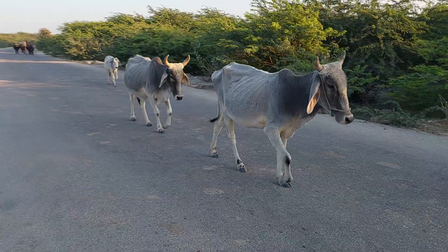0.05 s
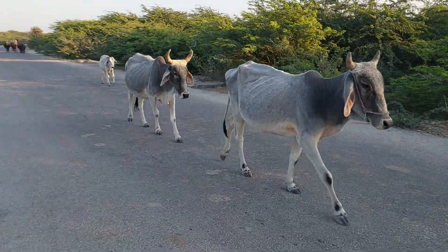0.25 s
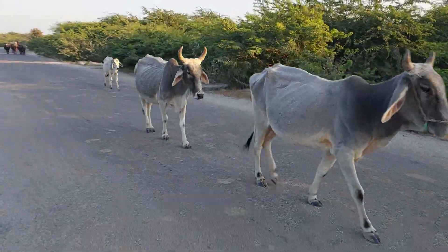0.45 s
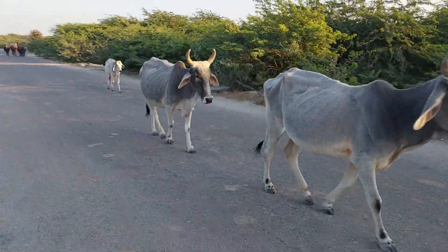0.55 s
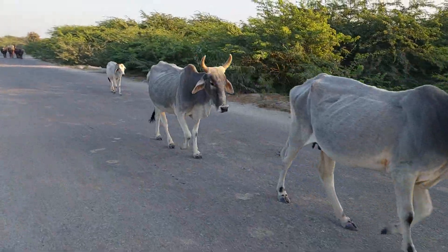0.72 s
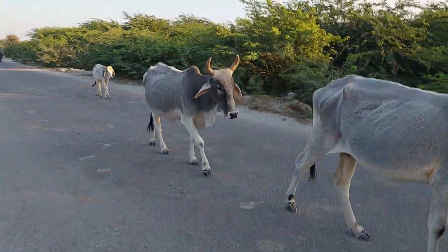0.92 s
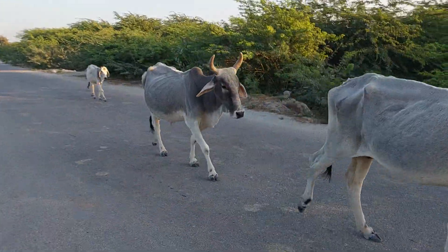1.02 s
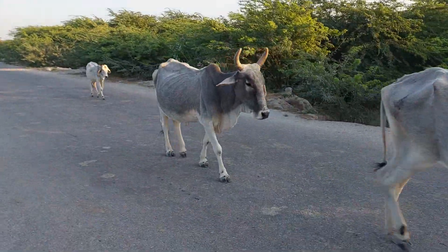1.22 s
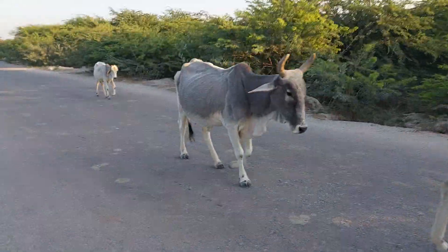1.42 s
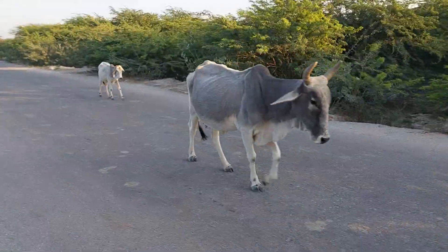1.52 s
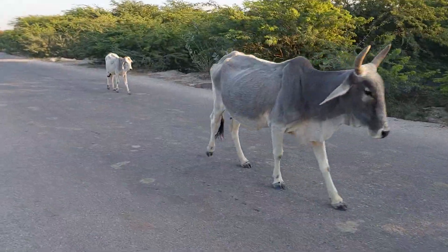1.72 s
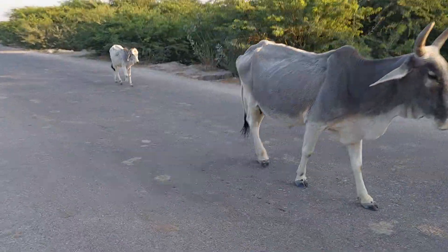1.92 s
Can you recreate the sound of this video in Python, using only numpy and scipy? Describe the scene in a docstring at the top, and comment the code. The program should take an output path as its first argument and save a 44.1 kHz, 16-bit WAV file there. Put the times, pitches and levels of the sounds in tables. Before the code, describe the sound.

Hoof scuffs and clicks of walking cattle on asphalt, with one-sided handling noise and faint bird notes

```python
"""Cattle scuff along a paved road past a hand-held phone: gritty noise drags, stone rings and hoof clicks.
A finger half covers the right microphone port: noise slides rub on it, short bursts tick,
pressure pulses pop and damped oscillations thump. The left port is open.
A far bird pipes one note as a level-shaped sine, over low rumble and hiss made of filtered noise."""
import sys
import numpy as np
from scipy import signal
from scipy.fft import rfft, irfft, next_fast_len
from scipy.io import wavfile
from scipy.ndimage import uniform_filter1d

SR = 44100
rng = np.random.default_rng(int(sys.argv[2]) if len(sys.argv) > 2 else 0)


def output_pcm(signal):
    """Save a mono or channel-first signal as 16-bit PCM at the path in sys.argv[1].

    Samples are clipped to [-1, 1] before scaling.
    """
    pcm = np.clip(np.atleast_2d(signal).T, -1, 1) * 32767
    wavfile.write(sys.argv[1], SR, np.round(pcm).astype(np.int16))


def invert_db(x):
    """Field ratio 10**(x/20) for x, a level in decibels (scalar or array-like)."""
    u = np.asarray(x, float) / 20
    return 10 ** u


N = 85995


def evened(x):
    """Power normalisation: scales to rms 1."""
    return x / np.sqrt(np.mean(x ** 2) + 1e-20)


def read(points, hz):
    """Logarithmic frequency scale: interpolates a spectrum table along it."""
    f, value = np.transpose(points)
    return np.interp(np.log(hz + 1), np.log(f + 1), value)


def add(mix, start_s, sound):
    """Linear superposition: adds a sound to the mix from start_s."""
    part = mix[round(start_s * SR):][:len(sound)]
    part += sound[:len(part)]


def colour(x, curve_db):
    """Linear filtering: multiplies the spectrum by a function from Hz to dB."""
    size = next_fast_len(len(x) + 4096)
    gain = invert_db(curve_db(np.fft.rfftfreq(size, 1 / SR)))
    return irfft(rfft(x, size) * gain, size)[:len(x)]


def gritty(n, per_s, spread_db):
    """Stick-slip friction: noise whose loudness jumps at random in sub-millisecond grains."""
    draw = rng.random((n, 2))
    size = invert_db(spread_db * np.minimum(-np.log(draw[:, 0] + 1e-9), 2.6))
    jumps = size * (draw[:, 1] < per_s / SR)
    loudness = 1.55 + signal.lfilter([1], [1, -.93], jumps)
    return evened(rng.standard_normal(n) * loudness)


def clicks(rows, decay_s, octaves, body):
    """Impulsive excitation: tiny decaying noise bursts in a band around their pitch."""
    out, t = np.zeros(N), np.arange(-256, 768) / SR
    for start_s, level_db, pitch_hz in rows:
        impulse = -2. * (abs(t) < 1e-6)
        burst = impulse + .5 * rng.standard_normal(len(t))
        burst = burst * np.exp(-abs(t) / decay_s) * (t >= 0)
        burst = colour(burst, lambda f: read(body, f) - 6 * (np.log2((f + 30) / pitch_hz) / octaves) ** 2)
        add(out, start_s + t[0], invert_db(level_db) * burst * 4 / np.linalg.norm(burst))
    return out


# resonances of crushed grit: pitch_hz
STONES_HZ = [2946, 4050, 5800]
STONE_RING_S, STONE_DB = 0.0003, -1.5  # decay time; level against the grit noise
SCUFF_GRITS_PER_S, SCUFF_GRIT_DB = 1200, 6.5  # grain rate and spread of grain levels


def crunch(n):
    """Impulse response of small resonators: grit noise plus sparse grains, each ringing one stone pitch."""
    grit, t = gritty(n, SCUFF_GRITS_PER_S, SCUFF_GRIT_DB), np.arange(300) / SR
    rings = np.zeros(n)
    for pitch_hz in STONES_HZ:
        draw = rng.random((n, 2))
        size = invert_db(-SCUFF_GRIT_DB * np.log(draw[:, 0] + 0.11))
        hits = size * (draw[:, 1] < SCUFF_GRITS_PER_S / SR / len(STONES_HZ))
        ring = t * np.exp(-t / STONE_RING_S) * np.sin(2 * np.pi * pitch_hz * t)
        rings = rings + np.convolve(hits, ring)[:n]
    return grit + invert_db(STONE_DB) * evened(rings)


# hooves dragging on grit, cut off at nine tenths of the length: start_s, length_s, level_db
SCUFFS = [(0.267, 0.036, -59.5), (0.372, 0.12, -57.5), (0.48, 0.14, -52.5), (0.792, 0.036, -53),
          (1.168, .025, -57.5), (1.3616, 0.034, -42), (1.389, 0.04, -50), (1.536, 0.016, -52.5),
          (1.666, 0.022, -59.5), (1.813, 0.019, -54.5), (1.838, 0.03, -55), (1.945, 0.025, -47)]
# spectrum of hoof on road, also read by the clicks: frequency_hz, level_db
SCUFF = [(100, 15), (700, 3), (3500, -2.5), (7500, -6), (15000, -16.5)]
SCUFF_RISE_S, SCUFF_FADE_DB = 0.0023, -13  # the fade would be complete at the full length


def hoof_scuffs():
    """Sliding friction: drags of crunching grit that rise fast and fade late."""
    out = np.zeros(N)
    for start_s, length_s, level_db in SCUFFS:
        t = np.arange(0, length_s * 0.9, 1 / SR)
        drag = evened(colour(crunch(len(t)), lambda f: read(SCUFF, f)))
        fade = invert_db(level_db + SCUFF_FADE_DB * (t / length_s) ** 4)
        add(out, start_s, np.minimum(t / SCUFF_RISE_S, 1) * fade * drag)
    return out


# hoof edges clicking on stones: start_s, level_db, pitch_hz
GRIT = [(.3967, -38, 2130), (.4955, -35.5, 1360), (.5706, -63, 3400), (1.03, -38, 1040),
        (1.1691, -36.5, 2150), (1.35, -36, 1400), (1.3655, -35, 3100), (1.3735, -42, 3080),
        (1.378, -40, 4500), (1.3957, -26.5, 5600), (1.4132, -32, 4860), (1.5432, -39, 1950),
        (1.6769, -36, 460), (1.7675, -52, 4400), (1.8156, -39, 1450), (1.842, -38, 5800),
        (1.8591, -41.5, 2940), (1.928, -47.5, 1960)]
GRIT_S, GRIT_OCTAVES = .0007, .5  # decay time; distance from the pitch to the -6 dB point


def hoof_clicks():
    """Impact excitation: hoof edges strike stones in short band-limited bursts."""
    return clicks(GRIT, GRIT_S, GRIT_OCTAVES, SCUFF)


ECHO_DB, ECHO_T60 = -9, .05  # level; seconds to decay by 60 dB


def hooves():
    """Diffuse scattering: drags and clicks gain a short noise tail off the road, different at each port."""
    direct = hoof_scuffs() + hoof_clicks()
    t = np.arange(3000) / SR
    tails = rng.standard_normal((2, 3000)) * invert_db(-60 * t / ECHO_T60) * np.minimum(t / 0.0048, 1)
    tails = tails / np.linalg.norm(tails[0])
    return direct + invert_db(ECHO_DB) * signal.fftconvolve(direct[None], tails, axes=1)[:, :N]


# the finger sliding over the right port: start_s, length_s, level_db (before a common lift), rise_s
RUBS = [(0.062, 0.049, -41, 0.013), (0.144, 0.11, -40, 0.056), (0.338, 0.075, -43.5, 0.0027),
        (0.396, 0.041, -34.5, 0.013), (0.435, 0.043, -36.5, 0.0042), (0.484, 0.019, -43, 0.024),
        (0.513, 0.025, -36.5, 0.0027), (0.58, 0.033, -36, 0.015), (0.612, 0.042, -32, 0.005),
        (0.675, 0.21, -49, 0.011), (0.7434, 0.022, -35, 0.0025), (0.7741, 0.02, -24.5, 0.0034),
        (0.789, 0.021, -34, 0.012), (0.851, 0.037, -34.5, 0.0032), (0.9328, 0.018, -37, 0.00067),
        (0.971, 0.029, -35.5, 0.005), (1.018, 0.022, -38, 0.0077), (1.135, 0.02, -34.5, 0.0041),
        (1.245, 0.024, -43, 0.0064), (1.3027, 0.035, -29, 0.0036), (1.7, 0.031, -37.5, 0.0015),
        (1.766, 0.018, -36, 0.0019)]
# spectrum of skin on the port, also read by the ticks: frequency_hz, level_db
RUB = [(40, 15), (250, 9), (800, 2.5), (2500, -3.5), (4500, -6.5), (6000, -16.5), (7600, -26.5),
       (11000, -12.5), (15500, -20.5)]
RUB_LIFT_DB, RUB_FADE_DB = 11.5, -12  # common lift; fade from the end of the rise to the length
RUB_OVERRUN_S = 0.0028  # time past the length; the closing ramp takes twice this
RUB_SLIPS_PER_S, RUB_SLIP_DB = 1000, 5  # slip rate and spread of slip levels
SLOW_S, SLOW_DULL_DB = 0.05, -7  # slow-rising slides are duller
CAVITY_HZ, CASE_HZ, CAVITY_DB = 2200, 274, 12.5  # they also ring the port cavity and the case
PRESS_BASS = 0.75  # dB of slide bass per dB of grip: a firmer grip gives more


def finger_rubs():
    """Stick-slip friction: skin slides shake the port cavity and case the more slowly they rise."""
    out = np.zeros(N)
    for start_s, length_s, level_db, rise_s in RUBS:
        t = np.arange(0, length_s + RUB_OVERRUN_S, 1 / SR)
        ramps = np.clip(np.minimum(t / rise_s, (t[-1] - t) / RUB_OVERRUN_S / 2), 0, 1)
        shape = ramps * invert_db(RUB_FADE_DB * np.maximum(t - rise_s, 0) / (length_s - rise_s))
        slow = np.tanh(rise_s / SLOW_S)
        bass_db = PRESS_BASS * (np.interp(start_s, *np.transpose(GRIP)) + 38)

        def slide_db(f):
            """Resonance: peaks at cavity and case on the skin spectrum."""
            peaks = sum(np.exp(-(4 * np.log(f / hz + 1e-9)) ** 2) for hz in (CAVITY_HZ, CASE_HZ))
            slow_db = SLOW_DULL_DB * (f > 2 * CAVITY_HZ) + CAVITY_DB * peaks
            return read(RUB, f) + bass_db / (1 + (f / 500) ** 2) + slow * slow_db

        slide = np.pad(shape * gritty(len(t), RUB_SLIPS_PER_S, RUB_SLIP_DB), 800)
        add(out, start_s - 800 / SR, invert_db(level_db + RUB_LIFT_DB) * colour(slide, slide_db))
    return out


# skin letting go of the case: start_s, level_db
TICKS = [(0.339, -33.5), (0.5108, -21), (.737, -26), (0.7447, -23), (0.7833, -18.5), (0.799, -19.5),
         (0.932, -24.5), (0.935, -15), (0.9385, -30), (0.956, -14), (1.0269, -17.5), (1.0302, -28),
         (1.039, -25.5), (1.09, -33.5), (1.5527, -37), (1.639, -30), (1.697, -33)]
TICK_S, TICK_HZ, TICK_OCTAVES = 0.000081, 5400, 2.52  # decay time; pitch; distance to the -6 dB point


def finger_ticks():
    """Adhesion release: skin lets go in very short, wide-band bursts."""
    rows = [(start_s, level_db, TICK_HZ) for start_s, level_db in TICKS]
    return clicks(rows, TICK_S, TICK_OCTAVES, RUB)


# air pressed into the port: crest_s, level_db of the crest, rise_s, fall_s
POPS = [(0.7758, -2.5, 0.00045, 0.00038), (.9670, -1.5, 0.000069, 0.000091),
        (1.1380, -.5, 0.000096, 0.0005)]
POP_DIP, POP_DIP_S, POP_SWING = 0.13, 0.0014, 0.17  # depths relative to the crest; dip width in s


def port_pops():
    """Air compression: a pressure crest with a small dip before it and a swing below zero after."""
    out, t = np.zeros(N), np.arange(-.005, .015, 1 / SR)
    for crest_s, level_db, rise_s, fall_s in POPS:
        crest = np.where(t < 0, np.exp(-(t / rise_s) ** 2), np.exp(-abs(t) / fall_s))
        dip = POP_DIP * np.exp(-((t + rise_s + POP_DIP_S) / POP_DIP_S) ** 2)
        swing = POP_SWING * np.exp(-((t - 4 * fall_s) / (2 * fall_s)) ** 2)
        add(out, crest_s + t[0], invert_db(level_db) * (crest - dip - swing))
    return out


# the case knocked against the hand: crest_s, level_db, pitch_hz
THUMPS = [(0.211, -22, 114), (0.388, -19.5, 107), (0.409, -19, 62), (0.522, -13.5, 72), (0.622, -16, 67),
          (0.64, -21.5, 98), (0.737, -13.5, 180), (0.749, -14.5, 87), (0.7823, -14, 105),
          (1.0915, -19.5, 313), (1.144, -20, 61)]
THUMP_RISE, THUMP_RING = 0.27, 0.56  # in cycles


def case_thumps():
    """Damped oscillation: each knock moves the case for a cycle or two of a low pitch."""
    out = np.zeros(N)
    for crest_s, level_db, pitch_hz in THUMPS:
        turns = np.arange(-1.2, 4, pitch_hz / SR)
        shape = np.where(turns < 0, np.exp(-(turns / THUMP_RISE) ** 2), np.exp(-abs(turns) / THUMP_RING))
        add(out, crest_s + turns[0] / pitch_hz, invert_db(level_db) * shape * np.cos(2 * np.pi * turns))
    return out


GRIP_HZ, GRIP_WIDTH = 45.6, 18.4  # centre and distance to the -6 dB point, in Hz


def rumble():
    """Narrow-band noise: white noise filtered to a very low band."""
    noise = rng.standard_normal(N)
    return evened(colour(noise, lambda f: -20 * np.log10(1 + ((f - GRIP_HZ) / GRIP_WIDTH) ** 2)))


# grip pressure on the right port, also setting the bass of the rubs: time_s, level_db
GRIP = [(0, -38.5), (1.1, -34.5), (1.2, -43), (1.43, -41), (1.44, -60)]


def grip_rumble():
    """Amplitude modulation: low pressure noise follows the grip."""
    return rumble() * invert_db(np.interp(np.arange(N) / SR, *np.transpose(GRIP)))


def finger():
    """Contact excitation: all sounds of the hand, heard by the right port only."""
    return finger_rubs() + finger_ticks() + port_pops() + case_thumps() + grip_rumble()


# a far bird: start_s, level_db at the left port, change_db over the note
NOTES = [(.08, -54, -14), (.296, -52, -17), (.52, -49, -15), (.715, -62, 5), (1.068, -57, -6),
         (1.228, -58, -2), (1.895, -56, -22)]
NOTE_S, NOTE_HZ, NOTE_RIGHT_DB = 0.068, 1079, 8  # the right port hears it louder by NOTE_RIGHT_DB


def bird():
    """Sinusoidal tone: short, nearly pure notes that sag or swell in level."""
    out, t = np.zeros(N), np.arange(0, NOTE_S, 1 / SR)
    edge = np.minimum(np.minimum(t, NOTE_S - t) / .012, 1)
    for start_s, level_db, change_db in NOTES:
        level = invert_db(level_db + change_db * t / NOTE_S)
        add(out, start_s, edge * level * np.sin(2 * np.pi * NOTE_HZ * t))
    return out * invert_db(np.array([[0], [NOTE_RIGHT_DB]]))


# spectrum of the open air: frequency_hz, level_db
RUMBLE = [(28, -1), (70, 0.5), (200, -19), (2000, -32.5), (2700, -36.5), (7000, -44), (15500, -55.5)]
RUMBLE_DB, PATCH_DB = -46.5, 2  # overall level; depth of the drifting patches above 200 Hz
SAME = 0.049  # correlation between the ports


def air():
    """Partly coherent noise field: low rumble and hiss with patches drifting in time and frequency."""
    frames, hz = N // 256 + 5, np.fft.rfftfreq(1024, 1 / SR)
    a, b, c, d, patches = rng.standard_normal((frames, 513, 5)).T
    patches = evened(uniform_filter1d(uniform_filter1d(patches, 30, 0), 8, 1))
    left, other = a + 1j * b, c + 1j * d
    z = np.array([left, SAME * left + np.sqrt(1 - SAME ** 2) * other])
    z *= invert_db(read(RUMBLE, hz)[:, None] + PATCH_DB * patches * (hz[:, None] > 200))
    return invert_db(RUMBLE_DB) * evened(signal.istft(z, nperseg=1024, noverlap=768)[1][:, :N])


# response of the half-covered port: frequency_hz, gain_db
COVER = [(60, -25), (200, -1), (800, 5.5), (2200, 6.5), (3000, 11), (4500, 3.5), (6000, -13.5), (7500, -18),
         (11000, 5), (15000, 2)]
HUM_DB = -44.5  # deep rumble on the open port


def scene():
    """Superposition at two ports: hooves and air pass the finger's cover on the right, the bird does not."""
    left, right = hooves() + air()
    open_port = left + invert_db(HUM_DB) * rumble()
    covered_port = colour(right, lambda f: read(COVER, f)) + finger()
    return np.array([open_port, covered_port]) + bird()


def top_cut(x):
    """Nothing passes above the cut-off."""
    return signal.sosfilt(signal.butter(12, 17000, fs=SR, output="sos"), x)


START_S = .055  # silence before the sound opens
MIC_LOW_HZ, MIC_TOP_HZ, MIC_TOP_DB = 41, 15700, -25  # bass cut; start and depth of the treble cut


def record(dry):
    """Band limiting: the ports open after a moment of silence, without deepest bass or highest treble."""
    high_pass = signal.butter(2, MIC_LOW_HZ, 'high', fs=SR, output='sos')
    opening = np.clip((np.arange(N) / SR - START_S) / 0.00063, 0, 1)
    opened = signal.sosfilt(high_pass, dry) * opening
    finished = np.array([colour(port, lambda f: MIC_TOP_DB * np.clip((f - MIC_TOP_HZ) / 600, 0, 1))
                         for port in opened])
    return top_cut(finished)


dry = scene()
out = record(dry)
output_pcm(out)
```